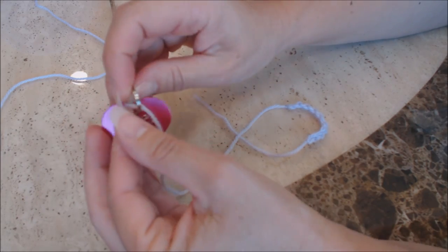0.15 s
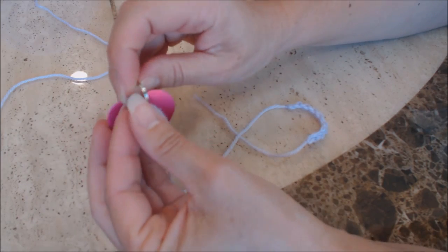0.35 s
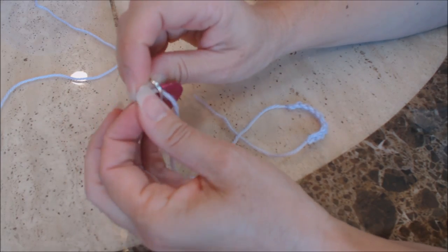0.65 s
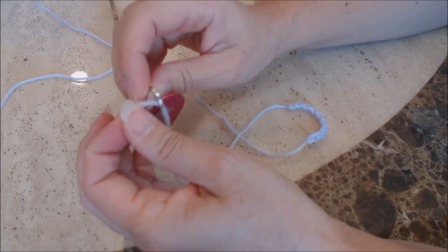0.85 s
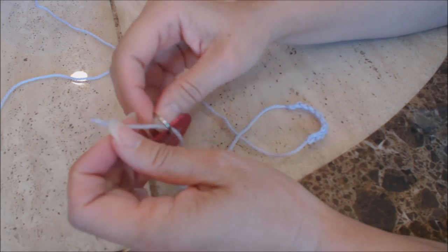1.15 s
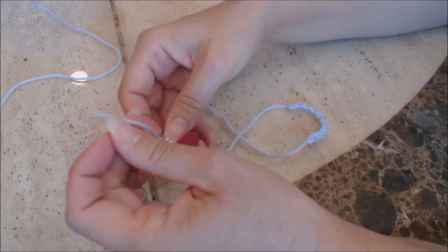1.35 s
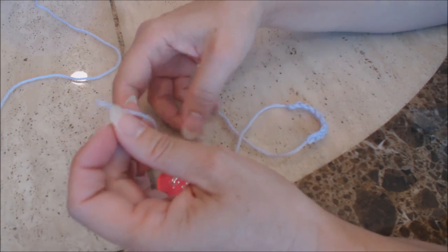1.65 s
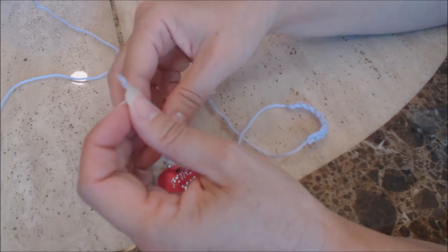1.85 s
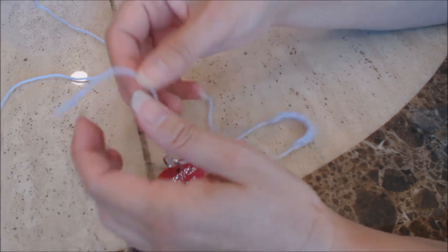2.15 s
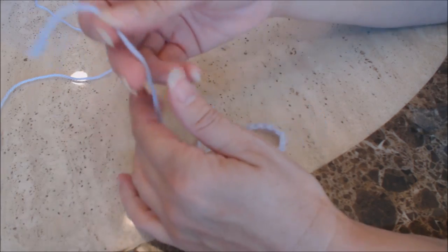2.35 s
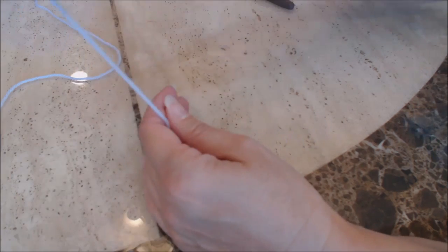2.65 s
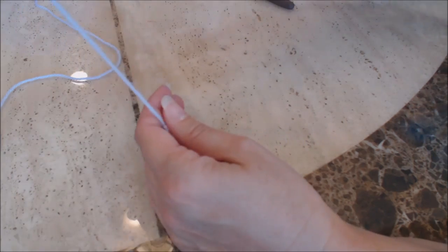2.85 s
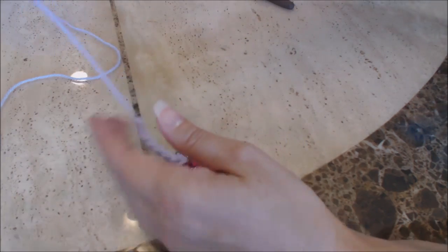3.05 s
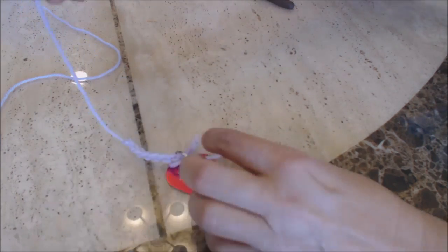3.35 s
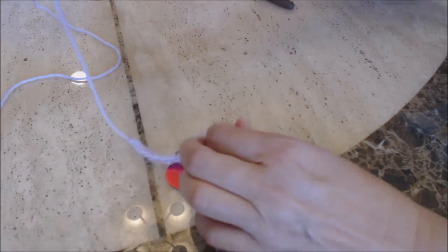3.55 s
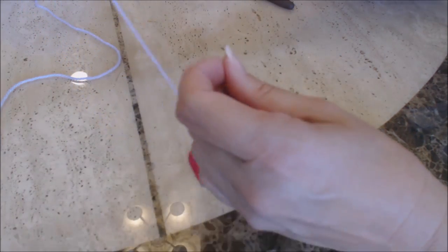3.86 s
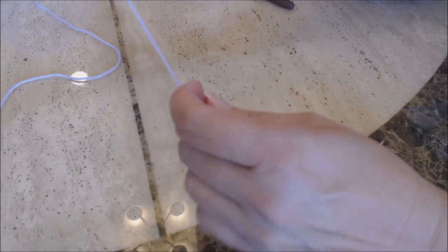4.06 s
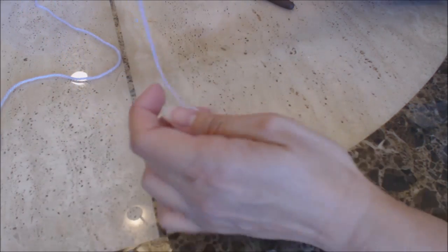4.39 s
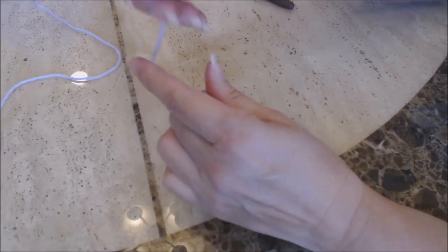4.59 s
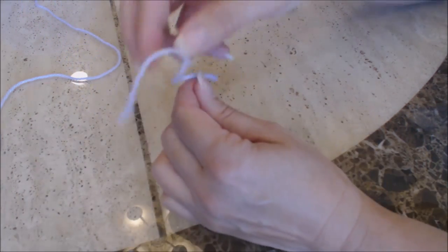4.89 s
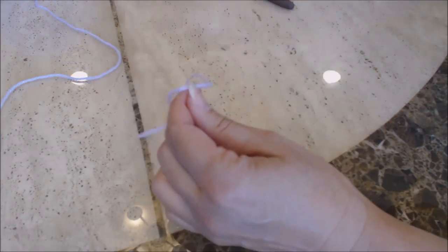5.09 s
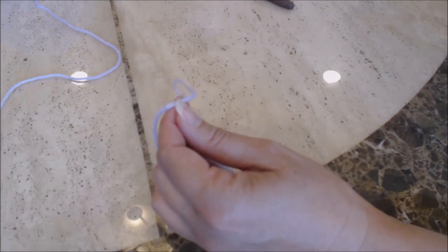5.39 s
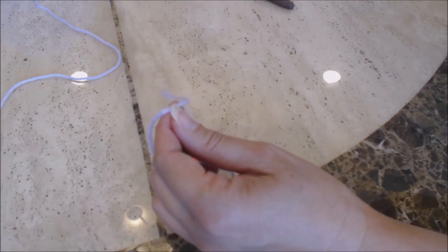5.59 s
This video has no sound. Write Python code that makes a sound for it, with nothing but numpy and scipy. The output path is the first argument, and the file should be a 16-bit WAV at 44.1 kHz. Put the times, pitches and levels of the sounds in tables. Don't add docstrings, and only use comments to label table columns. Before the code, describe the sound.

Over faint appliance hum and a fluttering high whine, nails tick softly on metal. A light metal tag hits stone in a rapid, shrill burst of bounces, with dull thuds and harsh overload, and settles quickly. Later the held tag gives tight, damped clinks as the cord is pulled and the tag lifted and turned, peaking in one hard clack. A last nail click follows in the small, dry room, miked close.

```python
import sys
import numpy as np
from scipy import signal
from scipy.io import wavfile
from scipy.ndimage import uniform_filter1d

SR = 44100
rng = np.random.default_rng(int(sys.argv[2]) if len(sys.argv) > 2 else 0)


def nominal_scale(level):
    x = np.asarray(level, float) / 20
    return 10 ** x


def unload_wav(signal):
    wavfile.write(
        sys.argv[1],
        SR,
        np.round(np.clip(np.atleast_2d(signal).T, -1, 1) * 32767).astype(np.int16),
    )


N = 252671
TIME = np.arange(N) / SR
HELD_S = 2.3


def at_hz(points, hz):
    table = np.array(points)
    return np.interp(np.log(hz), np.log(table[:, 0]), table[:, 1])


def rms_one(x):
    return x / np.sqrt(np.mean(x ** 2) + 1e-20)


def band(x, low_hz, high_hz):
    return signal.sosfilt(signal.butter(2, [low_hz, high_hz], "band", fs=SR, output="sos"), x)


def narrow(hz, width_hz, size):
    r = np.exp(-np.pi * width_hz / SR)
    poles = [1, -2 * r * np.cos(2 * np.pi * hz / SR), r * r]
    return rms_one(signal.lfilter([1, 0, -1], poles, rng.standard_normal(size)))


# frequency in Hz, left-right likeness from 0 to 1.
CHANNEL_LIKENESS = [(60, 0.997), (200, 0.89), (690, 0.953), (2340, 1), (7920, 1)]
# frequency in Hz, left minus right in dB.
CHANNEL_LEAN = [(60, 4.5), (160, -4), (420, -4), (1120, 1.5), (2980, 0.5), (7920, -1)]


def sides(mid, side, hz):
    alike = np.clip(at_hz(CHANNEL_LIKENESS, hz), 0, 1)
    lean_db = at_hz(CHANNEL_LEAN, hz) * np.array([[.5], [-.5]])
    pair = np.sqrt(1 + alike) * mid + np.sqrt(1 - alike) * side * [[1], [-1]]
    return pair * nominal_scale(lean_db) / np.sqrt(2)


def bands(low_hz, count, size=N):
    edges = low_hz * 2 ** (np.arange(count + 1) / 3)
    white = rng.standard_normal((2, 2, size))
    return [(np.sqrt(a * b), band(white[k % 2], a, b)) for k, (a, b) in enumerate(zip(edges, edges[1:]))]


def add(out, s, sound):
    i = round(s * SR)
    out[i:i + len(sound)] += sound[:N - i]


def modes(table, t60, rise_s, spread_db):
    t = TIME[:SR // 5, None]
    hz, level_db = np.array(table)[:, :2].T
    luck = rng.random((2, len(hz)))
    gains = nominal_scale(level_db + spread_db * (2 * luck[0] - 1))
    shape = (1 - np.exp(-t / rise_s)) * nominal_scale(-60 * t / t60)
    return (shape * np.sin(2 * np.pi * (hz * t + luck[1]))) @ gains / np.sqrt(np.sum(gains ** 2))


def crack(low_hz, high_hz, t60, rise_s):
    t = TIME[:SR // 10]
    shape = (1 - np.exp(-t / rise_s)) * nominal_scale(-60 * t / t60)
    noise = band(rng.standard_normal(len(t)), low_hz, high_hz)
    return rms_one(band(noise, low_hz, high_hz)) * shape


# frequency in Hz, level in dB.
SLAB_MODES = [(330, 3.5), (495, -4.5), (694, -4.5), (820, -8.5), (970, 0.33), (1240, -2), (1556, -13.5)]


def knock(low_hz, high_hz):
    thud = crack(low_hz, high_hz, t60=.09, rise_s=0.0028)
    inside = [mode for mode in SLAB_MODES if low_hz <= mode[0] <= high_hz]
    rung = modes(inside, 0.079, rise_s=0.0019, spread_db=7.0)
    return nominal_scale(1.0) * rung[:len(thud)] + nominal_scale(-4.5) * thud


def stroke(s, attack_s, hold_s, release_s, level_db):
    moments = s + np.cumsum([0, attack_s, hold_s, release_s])
    corners_db = level_db - 31 * np.array([1, 0, 0, 1])
    return nominal_scale(np.interp(TIME, moments, corners_db, -150, -150))


def grains(noise, depth_db):
    unevenness = rms_one(uniform_filter1d(rng.standard_normal(N), size=150))
    return rms_one(noise * nominal_scale(depth_db * unevenness))


# frequency in Hz, density in dB per Hz.
ROOM_TONE = [(21, -59), (35, -28), (113, -4.5), (159, -7.5), (208, -2.5), (392, -10.5), (491, -14),
             (788, -17), (966, -25), (1390, -21), (2550, -23), (3190, -32.5), (6280, -29.5), (6880, -24),
             (7700, -41.5), (10000, -71.5), (16900, -120)]
# time in seconds, level in dB.
ROOM_TONE_SWELL = [(0, -3), (1.4, -1.5), (2.2, 0.5335), (3.4, 4.5), (4.2, 3), (5.73, 2.5)]
# frequency in Hz, width in Hz, level in dB.
APPLIANCE_LINES = [(132.6, 24, -74.5), (205, 7.2, -69), (250.97, 9, -75.5), (302.4, 30, -75),
                   (500, 12, -83), (993.3, 90, -77.5), (2560, 160, -91.5), (4650, 290, -96),
                   (7440, 330, -82)]


def air():
    swell_db = np.interp(TIME, *np.transpose(ROOM_TONE_SWELL))
    swell_db = swell_db - swell_db.mean()
    tone = 0
    for hz, pair in bands(35, count=24):
        tone = tone + nominal_scale(at_hz(ROOM_TONE, hz) + swell_db * (1200 < hz < 5000)) * sides(*pair, hz)
    hum = sum(nominal_scale(level_db) * sides(*narrow(hz, width, (2, N)), hz) for hz, width, level_db in APPLIANCE_LINES)
    return nominal_scale(-71) * rms_one(tone) + hum


def whine():
    frames_per_s = 30
    phase = TIME * frames_per_s % 1
    on = uniform_filter1d(1. * (phase > .55) * (phase < .97), size=60)
    wobble = 1 + 0.31 * np.cos(2 * np.pi * (4 * phase + .4))
    tone = np.sin(2 * np.pi * 6730 * phase / frames_per_s) + 0.32 * narrow(6730, 150, N)
    flick = np.exp(-((phase - .92) / 0.09) ** 2) * narrow(7200, 350, N)
    return nominal_scale(-79) * on * wobble * tone + nominal_scale(-71 - 1.2 * TIME) * flick


# frequency in Hz, density in dB per Hz.
FRICTION_COLOUR = [(1470, -46.5), (2500, -33.5), (3210, -46), (3680, -14), (4630, -5.5), (5880, -8),
                   (7350, -16), (8200, -56), (10700, -86), (18000, -120)]
# start, attack, hold and release in seconds, level in dB.
RUB_STROKES = [
    (2.133, 0.042, 0.03, 0.049, -65),
    (2.183, 0.0042, 0.017, 0.041, -60.5),
    (2.868, 0.0019, 0.0031, 0.011, -51),
    (2.87, 0.0031, 0.028, .12, -61),
    (2.944, 0.0027, 0.0757, 0.06, -66.5),
    (3.281, 0.16, 0.041, 0.23, -77),
    (3.624, .002, 0.013, .01, -68.5),
    (5.168, 0.042, .015, .03, -73),
]


def rub():
    hiss = sum(nominal_scale(at_hz(FRICTION_COLOUR, hz)) * pair[0] for hz, pair in bands(2400, count=5))
    return grains(hiss, depth_db=1.0) * sum(stroke(*row) for row in RUB_STROKES)


# start in seconds, level in dB, low and high edge in Hz, decay time in seconds.
SLAB_BLOWS = [(1.633, -41, 200, 520, 0.092), (1.725, -40, 610, 3996, 0.0998),
              (1.7485, -28.5, 500, 4400, .06), (1.762, -13, 95, 300.1, .09), (1.774, -21.5, 601, 4000, .04),
              (1.786, -26.5, 400, 4630, 0.1), (1.9, -50.5, 1205, 1267, 0.1576),
              (2.872, -55, 350, 653.7, 0.09), (2.874, -66.5, 1300, 2600, 0.038),
              (3.632, -47, 299.4, 1010, 0.1495), (3.633, -57.5, 1200, 2290, .05),
              (4.25, -32.5, 150, 2598, 0.139)]


def blows():
    out = np.zeros(N)
    for s, level_db, low_hz, high_hz, t60 in SLAB_BLOWS:
        add(out, s, nominal_scale(level_db) * crack(low_hz, high_hz, t60, rise_s=0.00047))
    return out


# start in seconds, peak in dB, pitch in Hz,
# table knock against the peak in dB, decay time in seconds.
NAIL_TICKS = [(0.2095, -75, 2575, -11, .047), (0.4719, -53, 6810, -21, 0.029),
              (0.664, -65.5, 5030, -20.5, .03), (0.952, -54, 2654, -33.5, 0.046),
              (1.045, -71, 4650, -19, .08), (1.143, -54, 4695, -12.5, 0.0343),
              (1.2634, -63, 6020, -17.5, .012), (1.3696, -63.5, 4700, -9, 0.052),
              (1.5091, -62.5, 4720, -15.5, 0.0532), (2.1849, -44, 5720, -32, 0.047),
              (2.7995, -73, 2234, 6.5, 0.048), (3.1086, -68, 4650, 3, 0.046),
              (3.6276, -47, 4720, 10.5, 0.0089), (3.635, -59, 4291, 13.5, .03),
              (4.9196, -69, 6486, -7.5, 0.045), (5.2183, -41, 4700, -26, 0.011),
              (5.2221, -54, 4570, -21, .02), (5.2262, -52.5, 2637, -14, .025)]


def ticks():
    out = np.zeros(N)
    for s, peak_db, hz, knock_db, t60 in NAIL_TICKS:
        pair = [(hz, 0.1), (hz * 1.04, -6)]
        add(out, s, nominal_scale(peak_db - 2) * modes(pair, t60, rise_s=0.00052, spread_db=9.5))
        hiss = crack(0.722 * hz, min(2.2 * hz, 9000), t60 * 2.87, rise_s=0.002)
        add(out, s, nominal_scale(peak_db - 8) * hiss)
        add(out, s, nominal_scale(peak_db - 10) * crack(1800, 7500, t60=0.0174, rise_s=0.00052))
        add(out, s + .004, nominal_scale(peak_db + knock_db + 0.5) * knock(240, 970))
    return out


# start, # attack, hold and release in seconds, level in dB.
JINGLE_SWELLS = [(1.485, 0.0675, .003, 0.101, -57.5), (1.897, 0.0091, 0.0484, 0.085, -56.5),
                 (3.79, 0.025, 0.121, .035, -56), (3.8, 0.0098, 0.0366, .02, -55.5),
                 (4.017, 0.0036, 0.075, 0.011, -62.5), (4.078, 0.0031, 0.039, 0.049, -58),
                 (4.129, 0.1214, 0.028, 0.0015, -44), (4.223, 0.035, 0.0011, .001, -28.5),
                 (2.872, 0.0038, 0.0556, 0.0464, -57), (2.954, 0.0042, 0.059, .05, -60.5),
                 (3.299, 0.11, 0.085, .15, -75.5)]
JINGLE_LOW_HZ = [6680, 4021, 4550, 3690, 5600, 4700, 4700, 397, 6288, 6287, 3508]


def jingle():
    white = rng.standard_normal(N)
    out = np.zeros(N)
    for row, low_hz in zip(JINGLE_SWELLS, JINGLE_LOW_HZ):
        edge = signal.cheby1(4, 1, [low_hz, 7600], "band", fs=SR, output="sos")
        out += stroke(*row) * grains(signal.sosfilt(edge, white), depth_db=3.0)
    return out


# start in seconds, length in seconds, level in dB, first and last pitch in Hz.
PITCH_GLIDES = [(1.7215, 0.006, -23, 4370, 4450), (1.7735, .006, -24, 4300, 4400),
                (2.912, .011, -52.5, 4700, 5050), (3.85, 0.018, -59, 4750, 4700),
                (3.872, 0.017, -55.5, 4560, 4795), (3.923, 0.017, -56, 4610, 4700),
                (4.088, 0.02, -42.5, 5230, 4769), (4.106, 0.017, -39, 6960, 7655),
                (4.139, 0.0237, -64, 4630, 4700), (4.2525, 0.007216, -26, 4813, 4845),
                (4.278, 0.063, -49, 4750, 4693), (4.335, 0.091, -75.5, 4730, 4730)]


def glides():
    out = np.zeros(N)
    for s, length, level_db, first_hz, last_hz in PITCH_GLIDES:
        size = round(length * SR)
        turns = np.cumsum(np.linspace(first_hz, last_hz, size)) / SR
        add(out, s, nominal_scale(level_db) * np.hanning(size) ** 0.53 * np.sin(2 * np.pi * turns))
    return out


# start in seconds, clack in dB, table knock in dB.
EDGE_TOUCHES = [(2.8676, -72.5, -49), (2.8749, -65.5, -44), (2.9527, -68.5, -59), (3.0232, -66, -59.5),
                (3.814, -51.5, -65), (3.8222, -50, -53.5), (3.836, -50.5, -48), (3.8444, -58, -50),
                (3.8994, -60, -59), (3.9112, -74.5, -51), (3.9178, -58, -48), (4.089, -53.5, -60),
                (4.1078, -53, -62), (4.1752, -53.5, -63), (4.1941, -65, -60.5), (4.2178, -71.5, -59),
                (4.2479, -29.5, -32.5), (4.2541, -42, -43.5), (4.2592, -47, -44.5), (4.27, -53, -51),
                (4.2974, -68, -52.5), (4.3023, -67, -48), (4.311, -69, -50.5)]


def touches():
    out = np.zeros(N)
    for s, clack_db, knock_db in EDGE_TOUCHES:
        add(out, s, nominal_scale(clack_db + 6.0) * crack(1927, 2925, t60=0.0434, rise_s=0.0086))
        add(out, s, nominal_scale(knock_db - 2.0) * knock(650, 1520))
    return out


# frequency in Hz, level in dB.
BRIGHT_MODES = [(6350, -17), (6650, -7.5), (6920, -10.5), (7020, -5.5), (7140, -7), (7240, -4.5),
                (7340, -7.5), (7550, -8.5), (7860, -16.5)]


def bright_ring(t60, rise_s, spread_db):
    return modes(BRIGHT_MODES, t60, rise_s, spread_db)


# start in seconds, bright ring in
# dB, plate in dB, plate pitch in Hz.
HELD_CLINKS = [
    (2.8659, -24.5, -39.5, 4770),
    (2.8745, -48.5, -61, 4280),
    (2.8973, -38, -63, 5330),
    (2.919, -50.5, -66, 5150),
    (2.953, -29.5, -49, 5600),
    (2.986, -46, -61.5, 5210),
    (3.0071, -51, -55.5, 4830),
    (3.022, -54.5, -59.5, 5750),
               (3.803, -43, -48.5, 5266), (3.809, -29.5, -41.5, 5800), (3.8192, -30.5, -41.5, 5430),
               (3.822, -28, -37.5, 4700), (3.8288, -33.5, -39.5, 4720), (3.836, -27.5, -52, 5450),
               (3.8429, -29, -41, 4770), (3.848, -40.5, -50, 5545), (3.8825, -49, -47, 4850),
               (3.8891, -32.5, -40.5, 4912), (3.8998, -33, -42.5, 5330), (3.9111, -25.5, -40, 5810),
               (3.9145, -39, -53, 5600), (3.9194, -40, -57, 5530), (3.938, -45.5, -49.5, 4833),
               (4.0273, -48.5, -68.5, 5790), (4.0674, -45.5, -64, 5900), (4.0808, -37, -52, 5970),
               (4.085, -32, -40, 5850), (4.098, -53.5, -53, 5000), (4.104, -62, -50.5, 5365),
               (4.1073, -37.5, -41, 5420), (4.1101, -31, -46, 6098), (4.1542, -41, -52, 6027),
               (4.158, -36, -40.5, 5160), (4.1604, -56.5, -45.5, 5780), (4.176, -35.5, -45.5, 6054),
               (4.1788, -33.5, -36.5, 6010), (4.1939, -44, -52, 6060), (4.2039, -42, -55.5, 5030),
               (4.214, -37.5, -50.5, 6080), (4.2177, -25, -38, 4984), (4.247, -13, -23, 5215),
               (4.2536, -31, -25, 4640), (4.258, -19.5, -36, 5170), (4.2662, -32.5, -38.5, 5070),
               (4.2698, -22, -31.5, 5850), (4.2972, -39, -48.5, 5040), (4.3016, -33.5, -38.5, 5800),
               (4.311, -36, -43, 4727)]
# time in seconds, pitch in Hz.
GRIP_PITCH = [(2.866, 7240), (2.897, 7050), (2.919, 7190), (2.953, 6950), (3.007, 7300), (3.804, 7140),
              (3.81, 7300), (3.85, 7290), (3.889, 7250), (3.911, 7030), (3.939, 6930), (4.027, 6850),
              (4.068, 7570), (4.085, 7080), (4.157, 7320), (4.177, 6870), (4.217, 7080), (4.248, 6910)]
# frequency in Hz, level in dB.
HELD_PLATE_MODE = [(4735, -13.7)]


def clinks():
    out = np.zeros(N)
    for s, bright_db, plate_db, plate_hz in HELD_CLINKS:
        add(out, s - .001, nominal_scale(bright_db + 3.5) * bright_ring(0.01987, rise_s=0.00088, spread_db=1.0))
        ring_hz = np.interp(s, *np.transpose(GRIP_PITCH))
        add(out, s - .001, nominal_scale(bright_db + 5.0) * modes([(ring_hz, 0)], 0.017, rise_s=0.00127, spread_db=0))
        pair = [(plate_hz, 0.1), (plate_hz * 1.07, -5)]
        add(out, s, nominal_scale(plate_db + 6.5) * modes(pair, 0.0153, rise_s=0.00096, spread_db=5.5))
        add(out, s, nominal_scale(plate_db + 4.0) * crack(5000, 6800, t60=0.019, rise_s=0.0007))
        add(out, s, nominal_scale(plate_db - 17) * modes(HELD_PLATE_MODE, 0.108, rise_s=.003, spread_db=3.0))
    return out


# start in seconds, length in seconds, level in dB, pitch in Hz,
# change of level to the end in dB.
EDGE_SKIDS = [(1.7248, 0.00792, -10, 7027, 1), (1.733, 0.0157, -18.5, 6950, 0),
              (1.7371, .0012, -15, 6860, 0.5), (1.7448, 0.0057, -17.5, 7348, 2),
              (1.7481, 0.0082, -11, 7030, -4), (1.7555, 0.00455, -16, 7010, 5.5),
              (1.7575, 0.02185, -9, 7150, 0), (1.7749, .003, -15, 7230, -3),
              (1.7789, 0.0096, -7, 6846, -6.5), (1.788, 0.021, -22.5, 7080, 0),
              (1.8071, 0.0039, -11.5, 7118, -1.5), (1.8116, .0042, -12.5, 7176, 0),
              (4.2474, 0.000737, -5, 7283, 1), (4.249, 0.006, -8, 6970, -2.5),
              (4.2565, .0085, -13, 6966, -8)]


def skid():
    out = np.zeros(N)
    for s, length, level_db, hz, change_db in EDGE_SKIDS:
        t = TIME[:round(length * SR)]
        fade = np.clip(np.minimum(t, length - t) / 0.00013, 0, 1)
        gain = nominal_scale(level_db + change_db * t / length) * fade
        song = np.sin(2 * np.pi * hz * t) + 0.34 * narrow(hz, 550, len(t))
        plate_db = -21 - 4 * (s > HELD_S)
        add(out, s, gain * (song + nominal_scale(plate_db) * narrow(4500, 990, len(t))))
    return out


# frequency in Hz, level in dB.
FREE_PLATE_MODES = [(4370, -1.2032), (4680, -24)]


def loose_hit(out, s, bright_db, bright_t60, plate_db, plate_t60, clack_db, knock_db):
    add(out, s, nominal_scale(bright_db + 2.5) * bright_ring(bright_t60, rise_s=0.00068, spread_db=6.5))
    upper = modes([(7050, 0)], 1.75 * plate_t60, rise_s=0.0005, spread_db=0)
    add(out, s, nominal_scale(bright_db - 5.5) * upper)
    add(out, s, nominal_scale(plate_db - 0.5) * modes(FREE_PLATE_MODES, plate_t60, rise_s=0.00032, spread_db=2.0))
    add(out, s, nominal_scale(plate_db + 3.0) * crack(1500, 7600, t60=0.013, rise_s=0.0002))
    add(out, s, nominal_scale(clack_db) * crack(1200, 2900, t60=0.048, rise_s=0.00075))
    add(out, s, nominal_scale(knock_db + 2.0) * knock(400, 1600))


# start in seconds, bright ring in dB, table knock in dB.
FLAT_RATTLE = [(1.7987, -14, -30), (1.8175, -19.5, -40.5), (1.8235, -20, -49.5), (1.832, -32, -52),
               (1.8385, -29, -59.5), (1.8437, -21, -64), (1.8481, -28, -73), (1.8548, -33, -66),
               (1.862, -29.5, -66.5), (1.8663, -29.5, -66), (1.8689, -17.5, -62), (1.8737, -24.5, -73),
               (1.882, -28, -69.5), (1.889, -28.5, -63), (1.8985, -24.5, -65.5), (1.9015, -22, -55.5),
               (1.911, -42, -57), (1.935, -45.5, -61), (1.9388, -45, -69), (1.946, -52, -73),
               (1.951, -58.5, -73), (1.963, -56.5, -80.5)]


def rattle():
    out = np.zeros(N)
    for s, ring_db, knock_db in FLAT_RATTLE:
        clack_db = -38 - 190 * (s - FLAT_RATTLE[0][0])
        loose_hit(out, s, ring_db, 0.027, ring_db - 20.5, .025, clack_db, knock_db)
        add(out, s, nominal_scale(ring_db - 10) * crack(4800, 5200, t60=.012, rise_s=0.00037))
    return out


# start in seconds, bright ring, plate mode and table knock in dB.
TAG_BOUNCES = [
    (1.625, -40.5, -45, -58.5),
    (1.6318, -29, -27.5, -30),
    (1.6369, -29, -32, -43),
    (1.649, -25.5, -25, -30),
    (1.665, -22, -25.5, -39.5),
    (1.6763, -23, -28, -35.5),
    (1.692, -34.5, -43.5, -43.5),
    (1.705, -30.5, -45.5, -47.5),
]


def drop():
    out = np.zeros(N)
    for s, ring_db, plate_db, knock_db in TAG_BOUNCES:
        loose_hit(out, s, ring_db, 0.032, plate_db, .08, knock_db + 1.5, knock_db)
    return out


# frequency in Hz, reverberation time in seconds.
REVERB_T60 = [(200, 0.12), (1000, 0.21), (3000, 0.18), (4200, .2), (5000, 0.54), (6000, .3), (7000, .35)]
# frequency in Hz, level of the tail in dB.
REVERB_LEVEL = [(200, -25), (1000, -3.5), (3000, -5), (4300, -20), (5000, -24), (6000, -18), (7000, -12.5)]


def room(x):
    t, tail = TIME[:SR // 2], 0
    for hz, pair in bands(160, count=17, size=len(t)):
        t60 = at_hz(REVERB_T60, hz)
        decay = nominal_scale(at_hz(REVERB_LEVEL, hz) - 60 * t / t60)
        tail = tail + decay * sides(*pair, hz) / np.sqrt(t60 * SR / 14)
    return signal.fftconvolve(x[None], tail * np.clip(t / 0.011, 0, 1), axes=1)[:, :N]


def gate(x):
    level_db = 10 * np.log10(uniform_filter1d(np.mean(x ** 2, axis=0), size=600) + 1e-14)
    return x * nominal_scale(0.86 * np.minimum(level_db + 63, 0))


def scene():
    near = drop() + rattle() + skid() + clinks() + touches() + glides()
    faint = blows() + ticks() + rub() + jingle() + air() + whine()
    faint = signal.sosfilt(signal.cheby2(12, 40, 7850, fs=SR, output="sos"), faint)
    hand = nominal_scale(-24) * np.roll(near, 23) * [[1], [-1]]
    to_room = near * nominal_scale(-3.5 * (TIME > HELD_S))
    return near * nominal_scale(np.array([[-.3], [.3]])) + hand + gate(room(to_room)) + faint


# start in seconds, length in seconds.
SLAM_TIMES = [
    (1.7316, .0004),
    (1.7476, .00035),
    (1.7615, .005),
    (1.7668, .0067),
    (1.7793, .0062),
    (1.8106, .0006),
    (4.24985, .00022),
]
# level in dB, swings per second, share by which the membrane swings back.
SLAM_SWINGS = [(-16.5, 7800, .9), (-0.5, 2300, 0.27), (-5, 3750, 0.08), (-2, 4200, .1), (-1.5, 2650, .1),
               (-5, 3000, 0.1), (3, 5200, 0.45)]
# time in
# seconds, lean from -1 to 1.
MEMBRANE_LEAN = [(1.762, -.3), (1.7665, 0), (1.7672, -.8), (1.7678, .85), (1.769, .85), (1.7697, -.6),
                 (1.7712, -.4), (1.7727, .5), (1.774, 0),
                 (1.7795, 0), (1.7803, -.9), (1.7813, .9), (1.7821, -.8), (1.7828, .8), (1.7835, -.7),
               (1.784, .3), (1.7846, -.5)]


def slams():
    out = np.zeros((2, N))
    lean = np.interp(TIME, *np.transpose(MEMBRANE_LEAN))
    for (s, length), (level_db, swings, back) in zip(SLAM_TIMES, SLAM_SWINGS):
        t = TIME[:round(length * SR)]
        lasting = length > .002
        uneven_db = lasting * rng.normal(0, 4.0, 80)[(t * 4000).astype(int)]
        turns = np.cumsum(swings * nominal_scale(uneven_db)) / SR
        push = np.sin(np.pi * turns) - 1.3 * lasting * lean[round(s * SR):][:len(t)]
        rails = np.pad(-nominal_scale(level_db) * (np.tanh(4.0 * push) + .4 * rng.standard_normal(len(t))), 50)
        recoil = np.hanning(len(rails))
        rails = rails - back * rails.sum() * recoil / recoil.sum()
        differ_db = rng.normal(0, 2.2, 80)[np.arange(len(rails)) // 30]
        add(out[0], s - 50 / SR, rails)
        add(out[1], s - 50 / SR, rails * nominal_scale(differ_db))
    return out


# start in seconds, level in dB, frequency in Hz, decay time in seconds.
PORT_SHUDDERS = [
    (1.7466, -16.5, 1464, 0.012),
    (1.7625, -27, 1120, 0.033),
    (1.7785, -18, 900, 0.049),
]


def shudder():
    out = np.zeros(N)
    for s, level_db, hz, t60 in PORT_SHUDDERS:
        add(out, s, nominal_scale(level_db) * modes([(hz, 0), (hz * .82, -4)], t60, rise_s=0.0022, spread_db=1.5))
    return out * [[1], [-1]]


def overload(x):
    rail = .62
    excess = rail * np.tanh((x + slams()) / rail) - x
    x = x + signal.sosfilt(signal.butter(3, 100, "high", fs=SR, output="sos"), excess)
    x = np.clip(x, -1.1 * rail, 1.1 * rail) + shudder()
    x = signal.sosfilt(signal.butter(2, 55, "high", fs=SR, output="sos"), x)
    return np.clip(x, -1.1 * rail, 1.1 * rail)


def band_limit(x):
    return signal.sosfilt(signal.butter(12, 8520, fs=SR, output="sos"), x)


def record(dry):
    top_cut = signal.cheby2(10, 60, 8993.3, fs=SR, output="sos")
    mix = signal.sosfilt(top_cut, overload(dry))
    return band_limit(mix)


dry = scene()
out = record(dry)
unload_wav(out)
```